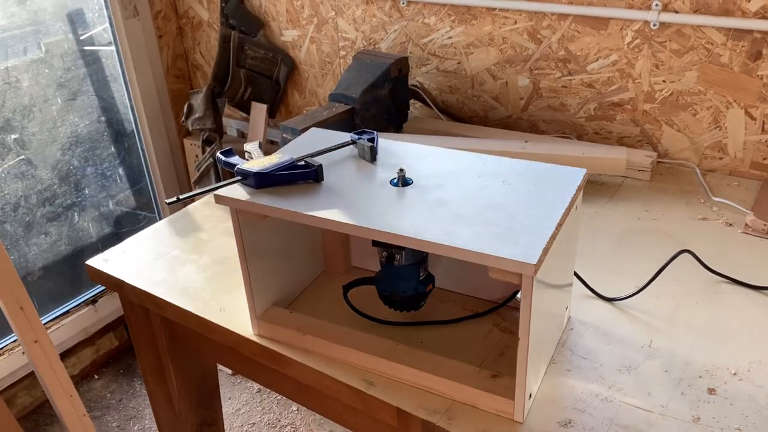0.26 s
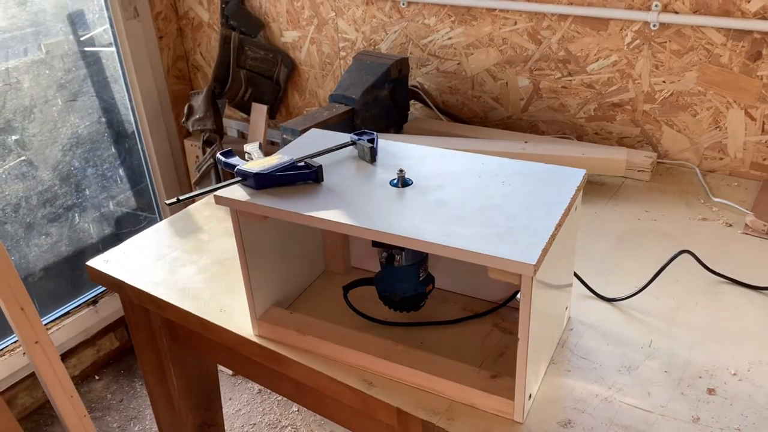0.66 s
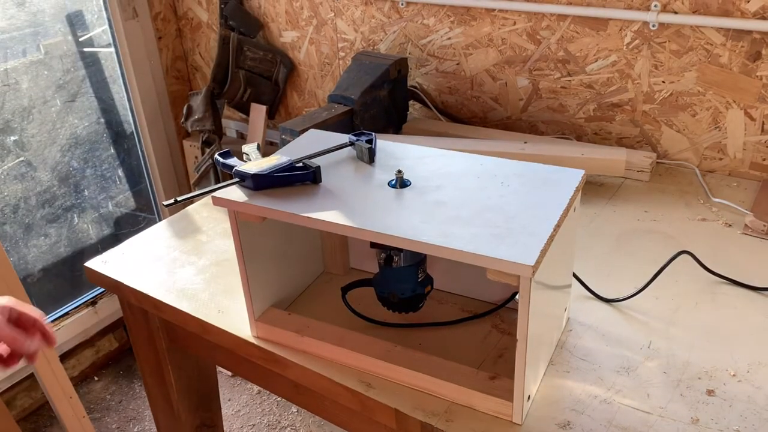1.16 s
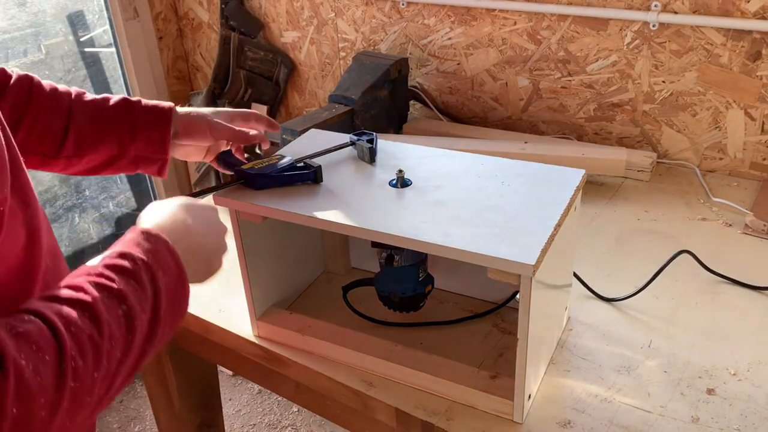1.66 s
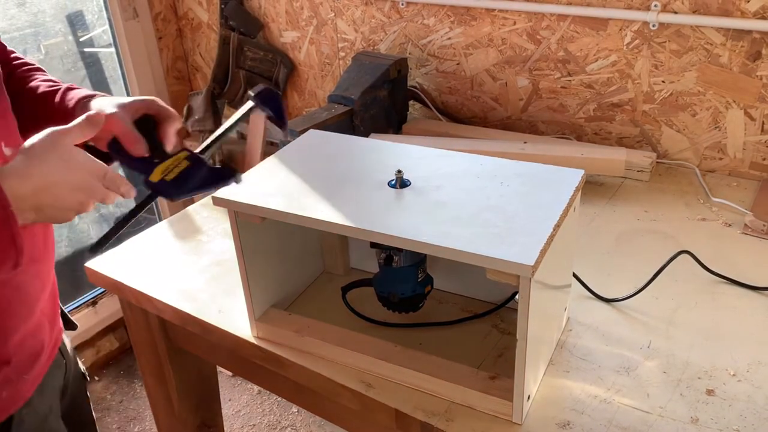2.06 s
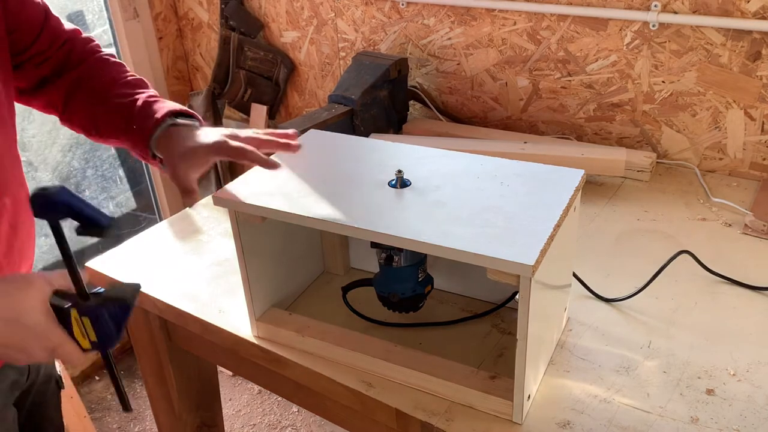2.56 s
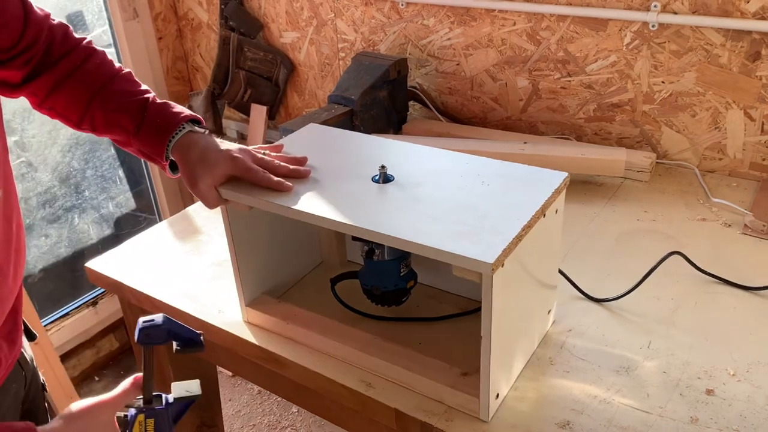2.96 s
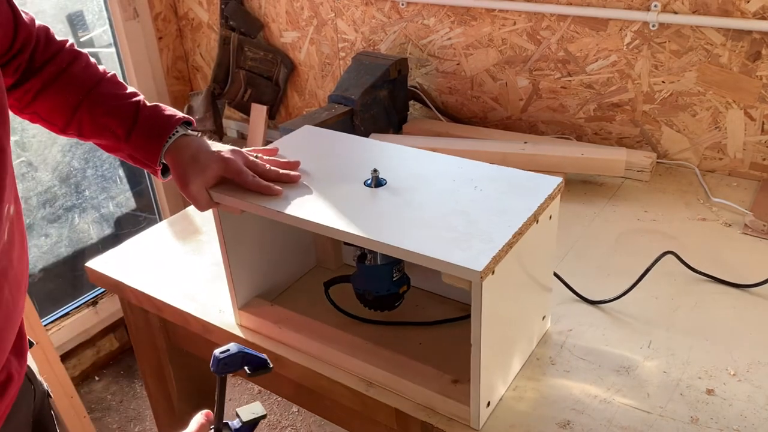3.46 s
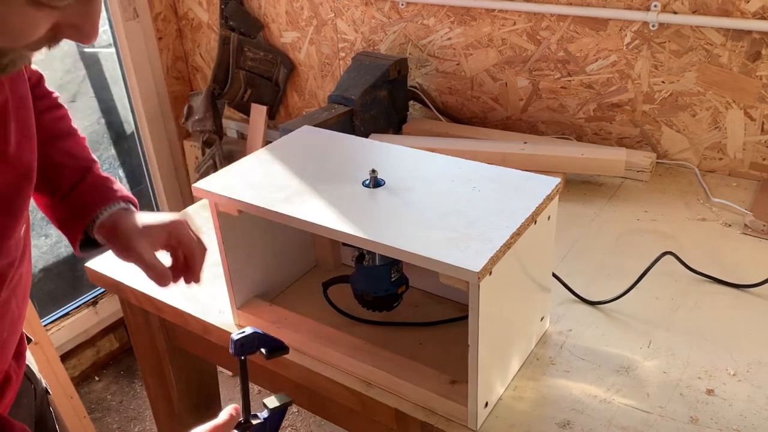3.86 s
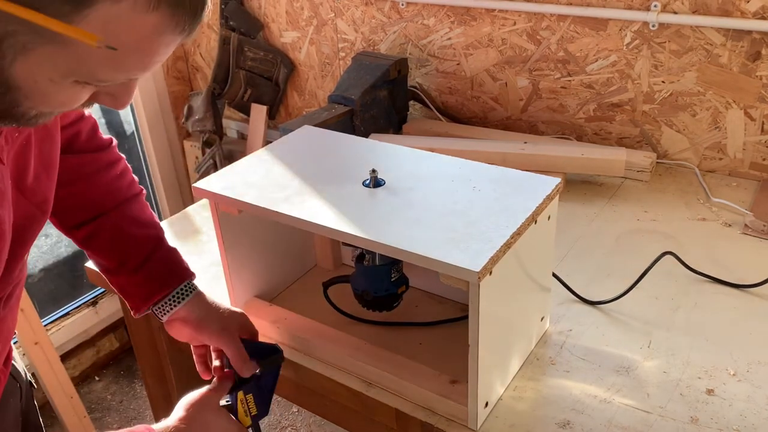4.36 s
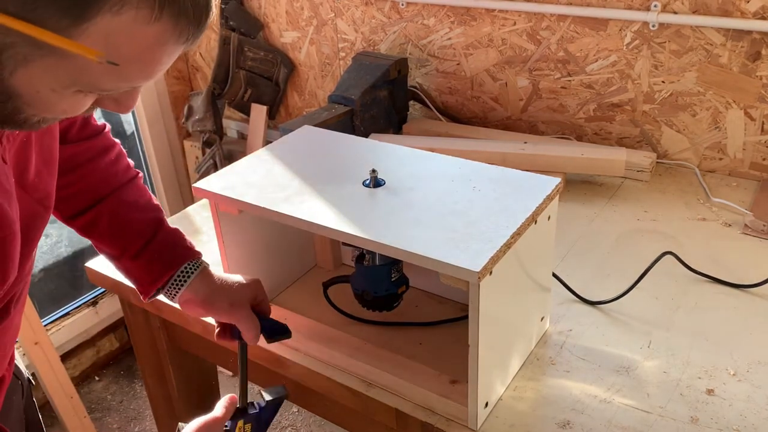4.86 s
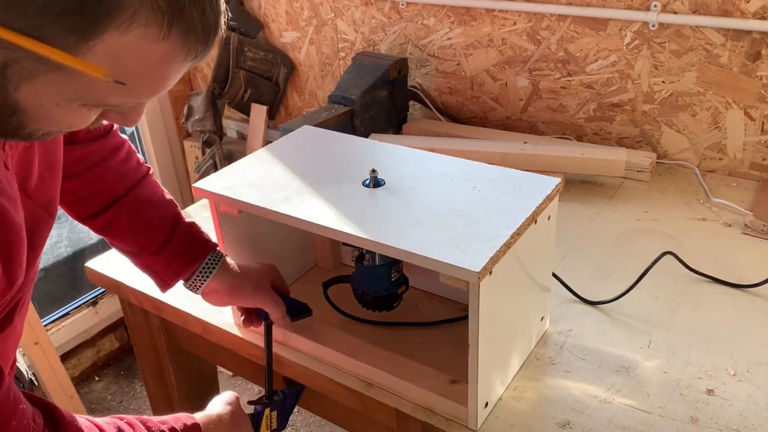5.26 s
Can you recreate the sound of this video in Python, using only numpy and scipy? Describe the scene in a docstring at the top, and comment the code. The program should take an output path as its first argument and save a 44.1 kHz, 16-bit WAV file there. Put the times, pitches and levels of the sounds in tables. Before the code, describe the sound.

In a small wooden workshop, soft bumps and footfalls, one loud metallic clamp knock, a hand rubbing, then sliding jaw chatter and sharp clacks.

```python
"""Clamp work in a small wooden workshop

Someone steps over a boarded floor, bumps a batten, lifts a bar clamp off a plywood box, slides its jaw and knocks it
on the table edge. Knocks, bumps and footfalls ring damped modes; creaks and the sliding jaw drive modes with noise.
Scuffs and sway are shaped noise, squeaks are narrow gliding bands. A room tail and two microphones finish it.
"""
import sys
import numpy as np
from scipy import signal
from scipy.fft import rfft, irfft
from scipy.io import wavfile
from scipy.ndimage import uniform_filter1d

SR = 44100
rng = np.random.default_rng(int(sys.argv[2]) if len(sys.argv) > 2 else 0)


def persist_wave(psi):
    """Save psi, clipped to +-1, as 16-bit WAV."""
    counts = np.round(np.clip(psi, -1, 1) * 32767).astype(np.int16)
    wavfile.write(sys.argv[1], SR, np.atleast_2d(counts).T)


N = 242991

# In every table, levels in dB are relative settings.
# Quiet workshop air, spectrum: pitch_hz, level_db
AIR_SPECTRUM = [(25, 2), (45, -20), (65, -21), (120, -8), (300, -23.5), (600, -5.5), (1200, 2.5),
                (1800, -13.5), (4000, -25.5), (8000, -18.5)]
# Fine hiss of friction and of the microphones, spectrum: pitch_hz, level_db
HISS_SPECTRUM = [(500, -8), (1500, -4.5), (3000, -6), (4100, -2), (5300, -13), (6400, -11), (7500, -11.5),
                 (9000, -14.5), (11000, -5), (13500, -8), (15500, -5.5)]
# Shifts of weight on boards and table: full_level_s, hold_s, sway_db, creak_db
WEIGHT_SHIFTS = [(0.0, 0.085, -53.5, -63.5), (0.124, 0.052, -47, -81), (0.202, 0.0075, -58, -45),
                 (0.239, 0.01, -44, -70), (0.314, 0.0039, -61.5, -55.5), (0.407, 0.47, -63.5, -71.5),
                 (0.836, 0.035, -72, -72), (0.983, 0.028, -53.5, -50.5), (1.08, 0.045, -43, -55.5),
                 (1.209, 0.0086, -44, -55), (1.248, 0.077, -42.5, -58), (1.38, 0.24, -61.5, -70),
                 (1.617, 0.063, -43, -59.5), (1.694, 0.0042, -45.5, -49), (1.741, 0.012, -39, -51.5),
                 (1.808, 0.11, -69, -58.5), (1.926, 0.11, -49, -63.5), (2.052, 0.14, -58.5, -73),
                 (2.357, 0.08, -65, -63.5), (2.508, 0.023, -38, -37), (2.628, 0.12, -38.5, -39),
                 (2.664, 0.17, -46.5, -48), (2.883, 0.062, -59.5, -55.5), (2.959, 0.017, -51.5, -45),
                 (3.061, 0.037, -43, -48), (3.158, 0.17, -54, -48), (3.325, 0.25, -56, -60.5),
                 (3.669, 0.0093, -45, -43), (3.749, 0.046, -54, -59.5), (3.912, 0.077, -51, -60.5),
                 (4.034, 0.2, -64, -70), (4.293, 0.26, -75.5, -73.5), (4.56, 0.37, -77, -70),
                 (4.989, 0.059, -52.5, -46), (5.172, 0.095, -56, -60.5), (5.365, 0.018, -52.5, -55.5),
                 (5.47, .04, -65, -62)]
# Deep sway of the floor, spectrum: pitch_hz, level_db
SWAY_SPECTRUM = [(15, -42.5), (28, -22), (40, -3), (50, 17), (62, 21), (75, 16.5), (100, 11.5), (135, 8.5),
                 (170, -29.5)]
# Ringing modes of the table top: pitch_hz, level_db, time_to_fall_60_db_s
TABLE_TOP_MODES = [(124.9, -2.5, 0.15), (170.3, 3.5, 0.1), (202.7, 1.5, 0.16), (243, 8, 0.093)]
# Ringing modes of the table edge: pitch_hz, level_db, time_to_fall_60_db_s
TABLE_EDGE_MODES = [(289.2, -0.29, 0.052), (346.3, -0.31, 0.058), (374, -3.3, 0.11), (411.2, -0.27, 0.066)]
# Ringing modes of the plywood box: pitch_hz, level_db, time_to_fall_60_db_s
BOX_MODES = [(500, -5.5, 0.088), (588, -7.5, 0.058), (712, -4, 0.06), (790, -9, 0.05), (853, -5, 0.05),
             (1040, -5, 0.071)]
# Round bumps of loose wood: start_s, level_db
BUMPS = [(0.099, -40), (0.149, -41.5), (0.202, -35), (0.277, -36), (0.331, -38), (1.697, -39),
         (3.646, -35.5)]
# Ringing modes of the batten: pitch_hz, level_db, time_to_fall_60_db_s
BATTEN_MODES = [(277, 0, 0.02), (515, 13, 0.019), (581, 5.5, 0.033)]
# Knocks and clicks: start_s, level_db, then each part relative to that level:
# table_top_db, table_edge_db, box_db, clamp_grip_db, clamp_jaw_db, crack_db
KNOCKS = [(0.1, -33, -5, -2.5, -18, -38, -28, -46), (0.15, -36.5, -3.5, -33, -11, -24, -35, -30),
          (0.177, -40, 2, -12, -30, -41, -40, -40), (0.204, -30.5, -6, -12, -13, -30.5, -25.5, -48),
          (0.277, -32.5, -43, -1, -11.5, -48, -22, -40), (0.332, -37.5, -25, -30, -23, -40, -17.5, -36),
          (0.566, -44, -31, -6, -10.5, -27, -38, -42), (0.785, -44.5, 1, -9, -22, -42, -46, -30),
          (0.909, -53, 6, 5, -11, -49, -39, -2), (0.966, -36.5, -4, -1, -20, -45, -20, -19),
          (1, -35, -10, -18, -20, -20, -7, 4), (1.065, -27, -8, -5, -7, -38, -37, -28),
          (1.125, -33.5, -3, -9, -12, -34, -29.5, -35), (1.278, -21.5, -17.5, -9.5, -23, -41, -42, -8.5),
          (1.488, -50, -29, 7.5, -27, -7, -13, 1), (1.563, -32, -22, -6, -8.5, -22.5, -44, -41),
          (1.585, -30.5, 1, -6, -5.5, -48, -39, -40), (1.694, -26, -11, -4, -12.5, -27, -19, -17),
          (1.815, -33.5, -4.5, -1, -21, -36, -9, -31), (2.477, -5.5, -32, -24, -22, -26, -6, -14),
          (3.409, -39, -14, -32, -29, -25, -18.5, -3.5), (3.528, -38.5, -30, -28, -7, -23, -12, -34),
          (3.645, -24, -7.5, -5.5, -4.5, -29, -15, -12), (3.679, -51.5, -26, -17, 28.5, -47, -38.5, -40),
          (3.886, -18, -20, -25.5, -19.5, -21.5, -14, -6.5), (4.261, -40, -17.5, -15, -18, -11.5, -34, -11),
          (4.862, -35, -27.5, -22, -12, -14, -29, 10), (4.964, -40.5, -5, -9.5, -14, -16, -9.5, -32),
          (4.974, -13.5, -16, -6.5, -26, -21, -14, -7.5), (5.005, -19, -11, -3, -36, -19, -16.5, -38),
          (5.176, -31.5, -17, -12.5, -10.5, -10.5, -26, -32),
          (5.337, -32.5, -10, -10, -17.5, -18, -22, -33), (5.371, -35.5, -5, -13, -21, -22, -16, -36),
          (5.392, -34, -15, -14, -25, -32, -38, -35), (5.4, -36, -14, -15, -25, -10, -9, 4.5),
          (5.475, -35.5, -23, -6, -19, -9.5, -8, -20)]
# Ringing modes of the clamp grip: pitch_hz, level_db, time_to_fall_60_db_s
GRIP_MODES = [(1232, 0, 0.008), (1436, 1, 0.03), (1600, 10, 0.022), (1725, 0, 0.015), (1900, -4, 0.018)]
# Ringing modes of the loose clamp jaw: pitch_hz, level_db, time_to_fall_60_db_s
JAW_MODES = [(2065, -14.5, 0.0082), (2493, -5, 0.0098), (2865, -6.5, 0.0071), (3200, -12.5, 0.011),
             (3580, -5.5, 0.0049), (3920, -4.5, 0.0014)]
# Short crack of contact, spectrum: pitch_hz, level_db
CRACK_SPECTRUM = [(1000, -14), (2500, -4), (4500, -2), (6500, 4), (11500, 8), (15500, 4)]
# Strokes of soles, sleeves and palm: full_level_s, rise_s, hold_s, fade_20_db_s, hiss_db, body_db
RUBS = [(0.113, 0.0078, 0.014, 0.051, -65.5, -66), (0.327, 0.092, 0.86, .2, -82.5, -103),
        (1.002, 0.023, 0.016, 0.18, -51, -114), (1.16, 0.047, 0.031, 0.091, -66, -103),
        (1.257, 0.055, 0.0041, 0.11, -54, -92), (1.665, 0.26, 0.055, .5, -62, -95),
        (1.78, .2, .22, .2, -64, -95), (2.18, .15, .01, .1, -55, -95), (2.26, .06, .005, .05, -56, -95),
        (2.36, .1, .11, .05, -57, -95), (2.479, 0.0078, 0.0033, 0.0081, -47, -37.5),
        (2.552, 0.13, 0.2, 0.11, -43, -99.5), (2.984, 0.18, 0.12, 0.024, -54.5, -62.5),
        (3.206, 0.093, 0.094, 0.036, -52, -69.5), (3.453, 0.11, 0.073, 0.033, -74, -72),
        (3.643, 0.018, 0.0039, 0.02, -57.5, -68.5)]
# Duller body under the friction hiss, spectrum: pitch_hz, level_db
RUB_BODY_SPECTRUM = [(300, -42), (700, 16), (1200, 10), (2000, 3), (3000, -0.5), (4200, -6), (5200, -9.5),
                     (7000, -33.5)]
# Footfalls that boom in the floor: start_s, level_db
FOOTFALLS = [(0.232, -26.5), (0.296, -45), (1.075, -38), (1.271, -58), (1.728, -41), (2.502, -35.5),
             (3.037, -34.5), (4.992, -32)]
# Ringing modes of the floor: pitch_hz, level_db, time_to_fall_60_db_s
FLOOR_MODES = [(56.2, 1.5, 0.18), (75, -4.5, 0.11), (131, -3.5, 0.15)]
# Squeaks, creaks and chatter on narrow bands that glide in pitch:
# start_s, end_s, first_hz, last_hz, width_hz, level_db
SQUEAKS = [(0.26, 0.288, 1787, 1515, 190, -62.5), (0.264, 0.372, 3150, 2925, 80, -72),
           (2.537, 2.632, 317, 397, 39.4, -40), (2.548, 2.587, 1690, 1560, 40.2, -73),
           (2.946, 3.125, 248.2, 221, 24.4, -44.5), (2.995, 3.062, 501, 454, 30.9, -43.5),
           (3.204, 3.299, 239, 219, 31, -55), (3.32, 3.458, 322.2, 269.4, 25, -51.5),
           (3.728, 3.867, 4290, 4190, 180, -58.5), (3.772, 3.812, 3945, 3810, 100, -53),
           (3.774, 3.832, 1388, 1343, 60, -51), (3.781, 3.83, 1878, 1767, 180, -55.5),
           (3.84, 3.885, 1650, 1783, 150, -47), (3.84, 3.891, 3220, 3070, 150, -50.5),
           (3.89, 3.974, 1424, 1279, 80, -52.5), (4.594, 4.642, 7760, 7300, 252, -36),
           (4.601, 4.644, 10650, 10700, 330, -36), (4.625, 4.692, 7100, 6685, 360, -41),
           (4.57, 4.623, 1510, 1639, 200, -49.5), (4.585, 4.702, 2866, 3020, 51, -56),
           (4.592, 4.66, 2454, 2530, 56, -55), (4.677, 4.73, 1930, 1880, 65, -53),
           (4.601, 4.683, 3700, 4250, 230, -58), (5.388, 5.43, 300.6, 295, 17, -44.5),
           (4.642, 4.74, 1550, 1795, 230, -50), (4.975, 5.05, 946, 774, 300, -71),
           (4.86, 4.929, 1506, 1513, 30, -66.5), (4.864, 4.913, 2350, 2280, 29.8, -73),
           (5.181, 5.263, 419, 456.5, 30, -52), (5.189, 5.3, 2600, 2616, 50, -72.5),
           (5.22, 5.501, 630, 599, 37, -65)]
# Blows that set the steel bar ringing: start_s, level_db
BAR_BLOWS = [(2.478, -29), (3.885, -60), (4.974, -37)]
# Ringing modes of the steel bar: pitch_hz, level_db, time_to_fall_60_db_s
BAR_MODES = [(514, 6.5, 0.097), (1482, -11.5, 0.096), (1490, 12, 0.038), (2095, -1.5, 0.15),
             (2440, -32.5, .12), (2670, -11, 0.062), (3060, -10, 0.096), (3670, -7.5, 0.098)]
# Jaw slides on the bar: full_level_s, rise_s, hold_s, fade_20_db_s, grip_db, jaw_db, steel_hiss_db
SLIDES = [(3.751, 0.054, 0.029, 0.054, -59, -60, -51.5), (3.783, 0.039, 0.022, 0.022, -54, -54.5, -47.5),
          (3.844, 0.031, 0.045, 0.014, -47, -53.5, -44.5), (3.897, 0.011, 0.018, 0.047, -71, -56.5, -86),
          (4.139, 0.035, 0.0044, 0.027, -77, -80.5, -73), (4.267, 0.024, 0.0082, 0.043, -67.5, -73, -98),
          (4.567, 0.023, 0.024, 0.14, -51, -54, -61.5), (4.606, 0.069, 0.016, 0.031, -52.5, -47, -35.5),
          (4.632, 0.046, 0.024, 0.073, -49.5, -39.5, -34.5),
          (4.861, 0.0033, 0.0025, 0.012, -58.5, -59.5, -58), (4.777, 0.085, 0.037, 0.12, -61, -66.5, -73.5),
          (5.189, 0.014, 0.02, 0.091, -66.5, -78, -83), (5.393, 0.0043, 0.0098, 0.11, -59, -55, -70),
          (5.494, 0.03, 0.022, 0.035, -58, -69, -76)]
# Hissing bands of the sliding steel: pitch_hz, width_hz, level_db
STEEL_BANDS = [(3630, 310, 7), (6130, 160, 16), (6840, 400, 8), (6890, 110, 17), (7830, 67, 31),
               (8440, 250, 13), (9900, 950, 19), (10260, 180, 2.5), (12600, 3700, 4), (15100, 900, -5)]
# Room tail in bands: pitch_hz, time_to_fall_60_db_s, level_db
ROOM_BANDS = [(103.7, 0.42, -14), (396, 0.21, -14), (1790, 0.26, 0), (4330, 0.24, 1.5), (10600, 0.14, 2.5)]
# How alike left and right are, limited to 0-1 when used: pitch_hz, likeness
LIKENESS = [(60, 0.9), (300, 0.93), (600, 0.35), (1000, 0.2258), (5600, 0.11), (6300, -1.05), (6400, 4),
            (16000, 6.5)]
# Balance of the microphone pair: pitch_hz, left_minus_right_db
BALANCE = [(2500, 0.5), (4000, -0.5), (5300, -4.5), (6200, -0.5)]

AIR_DB, TREBLE_HISS_DB = -74, -81.5
ROOM_DB = -1.5  # whole tail against the direct sound
DULLING_DB = 0.69  # lost per octave above the first mode, for each dB below the hardest blow
SHIFT_RISE_S = 0.053
SWAY_FADE_S, CREAK_FADE_S = 0.078, 0.046  # time to fall 20 dB
PORT_LAG_S, PORT_IN_STEP_HZ = 0.000204, 10950
TOP_HZ = 15750


def undb(db):
    """Turn dB into a plain gain."""
    return 10 ** (np.asarray(db) / 20)


def unit(x):
    """Scale to an average (RMS) level of 1."""
    return x / np.sqrt(np.mean(x ** 2))


def on_log_axis(points, size):
    """Read (pitch_hz, value) points at the bins of a transform."""
    hz, value = np.transpose(points)
    return np.interp(np.log(np.fft.rfftfreq(size, 1 / SR) + 1), np.log(hz), value)


def colour(x, points):
    """Shape the spectrum, keeping white noise of level 1 at level 1."""
    size = x.shape[-1]
    gain = unit(undb(on_log_axis(points, size)))
    return irfft(rfft(x) * gain, size)


def noise():
    """Two unrelated streams of white noise, one per channel."""
    return rng.standard_normal((2, N))


def walk(rate):
    """Slow random drift with spread 1, from `rate` random steps a second smoothed twice."""
    k = int(SR / rate)
    steps = np.repeat(rng.standard_normal(N // k + 1), k)
    smooth = uniform_filter1d(uniform_filter1d(steps, k), k)
    return unit(smooth[:N])


def grit(grain_db):
    """Two unrelated streams of tiny slips of uneven size."""
    return unit(noise() * undb(grain_db * rng.exponential(size=N)))


def mode(x, hz, t60):
    """One damped ring that falls 60 dB in t60 seconds."""
    r, w = np.exp(-np.log(1000) / (t60 * SR)), 2 * np.pi * hz / SR
    return signal.lfilter([.5, 0, -.5], [1, -2 * r * np.cos(w), r * r], x)


def swells(s, rise_s, hold_s, fade_s, level_db):
    """Envelopes that rise to full level at s, hold, and fade 20 dB per fade time; their powers add."""
    t = np.arange(0, N / SR + .002, .001)[:, None]
    rise = np.clip(1 - (s - t) / rise_s, 0, 1) ** 2
    fading_s = np.maximum(t - s - np.abs(hold_s), 0)
    gain = rise * undb(level_db - 20 * fading_s / fade_s)
    return np.interp(np.arange(N) / SR, t[:, 0], np.sqrt(np.sum(gain ** 2, axis=1)))


def fades(level_db, rise_s, fade_s):
    """An envelope that rises at each knock and dies away; both times are time constants."""
    x = np.zeros(N)
    x[(np.array(KNOCKS)[:, 0] * SR).astype(int)] = undb(level_db)
    rise, fade = np.exp(-1 / (rise_s * SR)), np.exp(-1 / (fade_s * SR))
    dying = signal.lfilter([1], [1, -fade], x)
    return signal.lfilter([1 - rise], [1, -rise], dying)


def blows(hits, level_db, modes, contact_s, scatter_db):
    """Each hit rings every mode by a random share; softer is duller, and longer contact builds up slower."""
    at = (np.array(hits)[:, 0] * SR).astype(int)
    hit_db = np.array(hits)[:, 1]
    softer_db = DULLING_DB * (np.max(hit_db) - hit_db)
    share = undb(scatter_db * rng.standard_normal((len(at), len(modes))))
    sign = rng.choice([-1, 1], (len(at), len(modes)))
    out = 0
    for k, (hz, db, t60) in enumerate(modes):
        octaves_up = np.log2(hz / modes[0][0])
        x = np.zeros((2, N))
        x[:, at] = undb(level_db + db - softer_db * octaves_up) * share[:, k] * sign[:, k]
        contact = mode(x, hz, contact_s * np.log(1000))  # contact_s is its time constant
        out = out + mode(contact, hz, t60)
    return out * 2 / (contact_s * SR * np.sqrt(len(modes)))


def quiet():
    """The still workshop as gently wavering noise, plus the microphones' own hiss."""
    air = colour(noise(), AIR_SPECTRUM) * undb(AIR_DB + 1.5 * walk(3))
    return air + undb(TREBLE_HISS_DB) * colour(noise(), HISS_SPECTRUM)


def sway():
    """The whole floor sways under the weight: swells of deep noise."""
    s, hold_s, sway_db, _ = np.transpose(WEIGHT_SHIFTS)
    return swells(s, SHIFT_RISE_S, hold_s, SWAY_FADE_S, sway_db) * colour(noise(), SWAY_SPECTRUM)


def creaks():
    """Shifting weight drives the wooden modes unevenly; soft soles excite little treble."""
    s, hold_s, _, creak_db = np.transpose(WEIGHT_SHIFTS)
    drive = noise() * undb(2.43 * walk(24.75))
    drive = signal.sosfilt(signal.butter(4, 650, fs=SR, output="sos"), drive)
    modes = TABLE_TOP_MODES + TABLE_EDGE_MODES + BOX_MODES[:2]
    # the modes ring shorter here than after a knock
    boards = unit(sum(undb(db) * unit(mode(drive, hz, 0.64 * t60)) for hz, db, t60 in modes))
    return swells(s, SHIFT_RISE_S, hold_s, CREAK_FADE_S, creak_db) * boards


def batten_bumps():
    """Round woody bumps: each blow rings the short modes of the batten."""
    return blows(BUMPS, np.array(BUMPS)[:, 1], BATTEN_MODES, contact_s=.0028, scatter_db=1.5)


def knocks():
    """Table, box and clamp grip ring; the loose jaw rattles on; a short crack marks the contact."""
    s, level_db, top, edge, box, grip, jaw, crack = np.transpose(KNOCKS)
    ringing = (blows(KNOCKS, level_db + top + 3.0, TABLE_TOP_MODES, contact_s=0.009, scatter_db=-3.5)
               + blows(KNOCKS, level_db + edge - 0.5, TABLE_EDGE_MODES, contact_s=0.0056, scatter_db=2.5)
               + blows(KNOCKS, level_db + box + 6.0, BOX_MODES, contact_s=0.00093, scatter_db=4.0)
               + blows(KNOCKS, level_db + grip + 7.0, GRIP_MODES, contact_s=0.0013, scatter_db=2))
    rattle = fades(level_db + jaw - 22.0, rise_s=0.0018, fade_s=0.0053) * noise()
    jaw_ring = sum(undb(db) * mode(rattle, hz, t60) for hz, db, t60 in JAW_MODES)
    contact = fades(level_db + crack - 10.0, rise_s=0.000087, fade_s=0.0022) * noise()
    return ringing + jaw_ring + colour(contact, CRACK_SPECTRUM)


def rubbing():
    """Rubbing makes many tiny slips: fine friction hiss over a duller body."""
    *shape, hiss_db, body_db = np.transpose(RUBS)
    slips = grit(grain_db=1.8) * undb(1.5 * walk(60))
    hiss = colour(slips, HISS_SPECTRUM)
    # the rough grain comes and goes separately in each register
    below = [signal.sosfilt(signal.butter(2, hz, fs=SR, output="sos"), hiss) for hz in (1800, 3200, 4800, 8500)]
    registers = np.diff([0 * hiss, *below, hiss], axis=0)
    hiss = sum(undb(2.5 * walk(40)) * part for part in registers)
    return swells(*shape, hiss_db) * hiss + swells(*shape, body_db) * colour(slips, RUB_BODY_SPECTRUM)


def footfalls():
    """Footfalls set off the low modes of the floor, which boom."""
    return blows(FOOTFALLS, np.array(FOOTFALLS)[:, 1], FLOOR_MODES, contact_s=0.03, scatter_db=-1.0)


def squeaks():
    """Stick-slip so quick that it sings on one narrow, gliding band."""
    out = np.zeros((2, N))
    for t0, t1, hz0, hz1, width_hz, db in SQUEAKS:
        a, b = int(t0 * SR), min(int(t1 * SR), N)
        chance = rng.standard_normal((2, 2, SR // 2))
        # slow complex noise sets the width; turning it moves the band to its gliding pitch
        waver = signal.lfilter([1], [1, -np.exp(-np.pi * width_hz / SR)], chance[0] + 1j * chance[1])
        waver = waver[:, a - b:] / np.sqrt(np.mean(np.abs(waver) ** 2) / 2)
        turn = np.exp(2j * np.pi * np.cumsum(np.linspace(hz0, hz1, b - a)) / SR)
        out[:, a:b] += undb(db) * np.sqrt(np.hanning(b - a)) * (waver * turn).real
    return out


def bar_ring():
    """Blows with brief contact leave the steel bar ringing."""
    return blows(BAR_BLOWS, np.array(BAR_BLOWS)[:, 1], BAR_MODES, contact_s=0.0003, scatter_db=3.0)


def chatter(slips, modes):
    """Dense slips ring a clamp part, and the share of each mode wanders as the jaw travels."""
    return unit(sum(undb(db + 3.5 * walk(30)) * unit(mode(slips, hz, 1.6 * t60)) for hz, db, t60 in modes))


def sliding():
    """The jaw chatters along the bar: dense slips ring grip and jaw and hiss in the steel."""
    slips = grit(grain_db=2.4) * undb(2 * walk(150))
    grip, jaw = chatter(slips, GRIP_MODES), chatter(slips, JAW_MODES)
    steel = 0
    for hz, width_hz, db in STEEL_BANDS:
        band = unit(mode(slips, hz, 1.5 / width_hz)) * np.sqrt(width_hz)  # a wider band carries more
        steel = steel + undb(db + 3 * walk(18)) * band
    steel = unit(signal.sosfilt(signal.butter(2, 3300, "high", fs=SR, output="sos"), steel))
    *shape, grip_db, jaw_db, steel_db = np.transpose(SLIDES)
    out = swells(*shape, grip_db) * grip + swells(*shape, jaw_db) * jaw + swells(*shape, steel_db) * steel
    # the sliding parts are too small to radiate bass
    return signal.sosfilt(signal.butter(10, 1270, "high", fs=SR, output="sos"), out)


def room(x):
    """Direct sound plus a noise tail whose bands die at their own rates, soonest in the top treble."""
    size = SR // 2
    t, tail = np.arange(size) / SR, 0
    for hz, t60, db in ROOM_BANDS:
        band_shape = [(hz / 4, -30), (hz / 2.02, 0), (hz * 0.8, 0), (hz * 4, -30)]
        band = colour(rng.standard_normal((2, size)), band_shape)
        tail = tail + band * undb(db - 60 * t / t60)
    tail = tail * (1 - np.exp(-t / 0.00021))  # quick build-up
    tail *= undb(ROOM_DB) / np.sqrt(np.sum(tail ** 2) / 2)
    tail[:, 0] += 1  # direct sound
    return signal.fftconvolve(x, tail, axes=1)[:, :N]


def scene():
    """Objects sound in the room; floor sway and quiet noise are added without the room tail."""
    wood = creaks() + batten_bumps() + knocks() + footfalls()
    friction_and_steel = rubbing() + squeaks() + bar_ring() + sliding()
    return room(wood + friction_and_steel) + sway() + quiet()


def record(dry):
    """Two microphone ports hear nearly the same bass; treble reaches the right first; the top is cut."""
    left, other = rfft(dry)
    hz = np.fft.rfftfreq(N, 1 / SR)
    like = np.clip(on_log_axis(LIKENESS, size=N), 0, 1)
    lead = np.where(hz > 3000, 2 * np.pi * PORT_LAG_S * (hz - PORT_IN_STEP_HZ), 0)  # radians
    right = like * left * np.exp(1j * lead) + 1j * np.sqrt(1 - like ** 2) * other
    half = undb(on_log_axis(BALANCE, size=N) / 2)  # each side takes half the difference
    pair = irfft(np.array([left * half, right / half]), N)
    return signal.sosfilt(signal.ellip(10, .2, 80, TOP_HZ, fs=SR, output="sos"), pair)


dry = scene()
out = record(dry)
persist_wave(out)
```